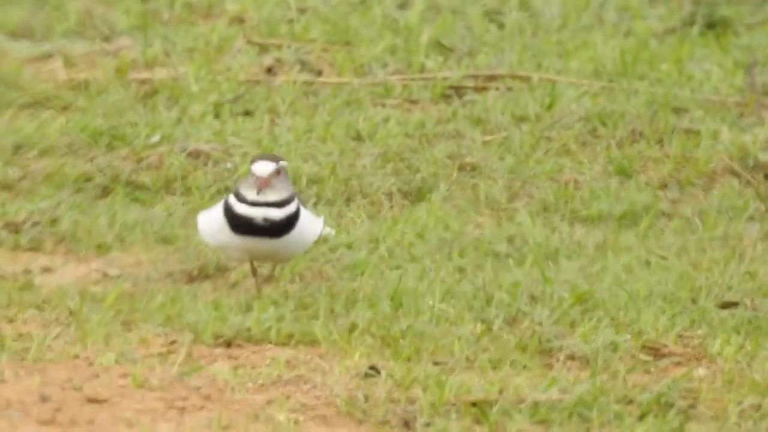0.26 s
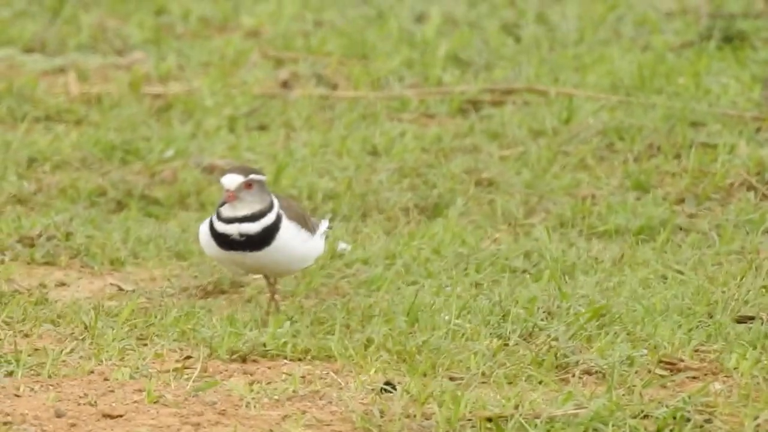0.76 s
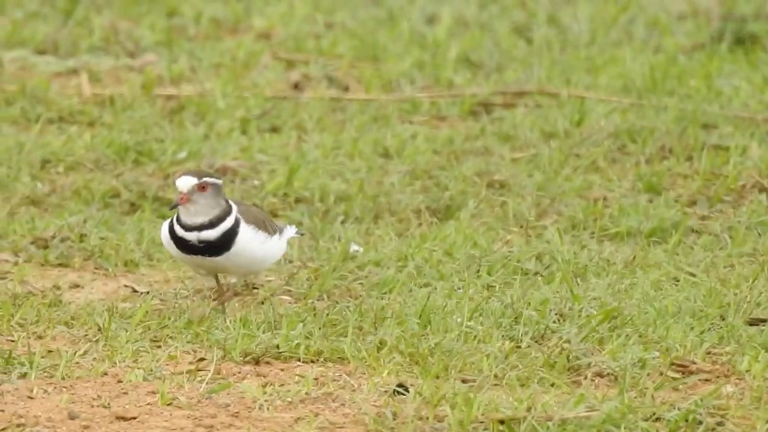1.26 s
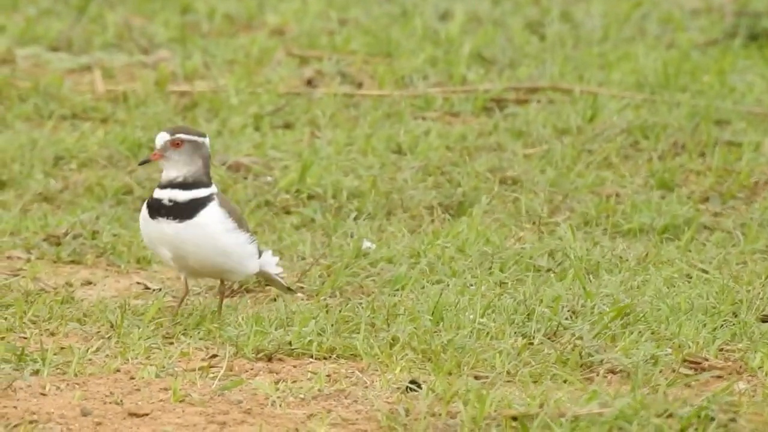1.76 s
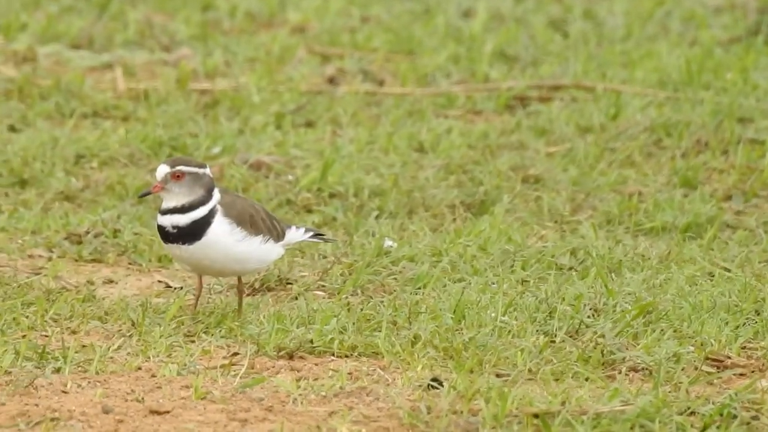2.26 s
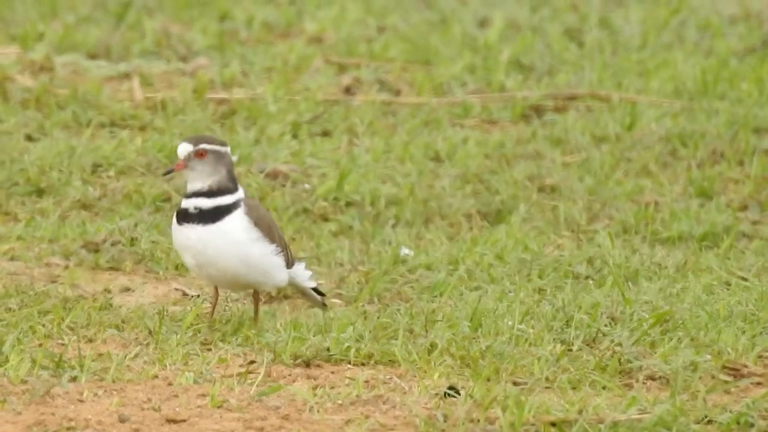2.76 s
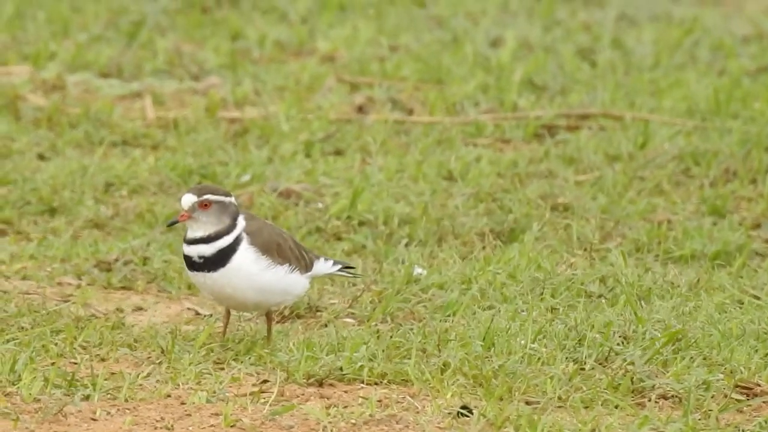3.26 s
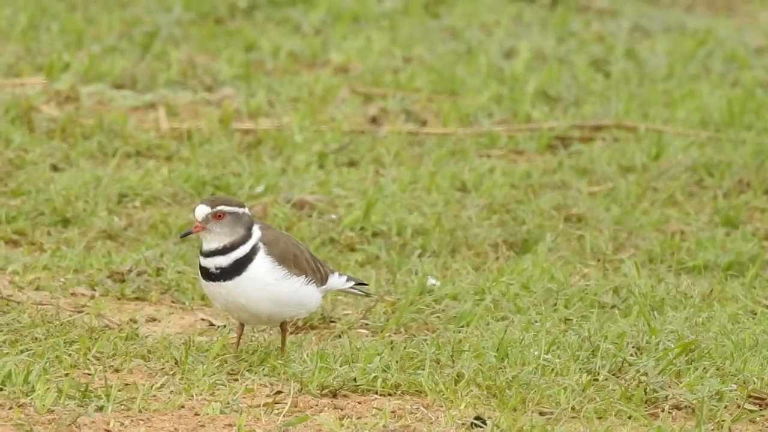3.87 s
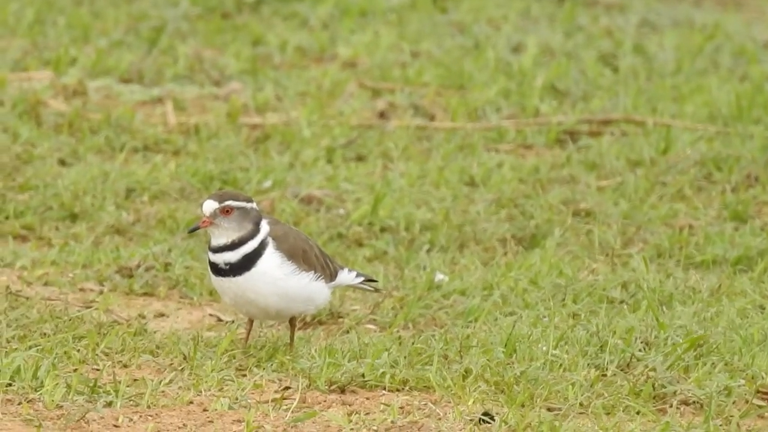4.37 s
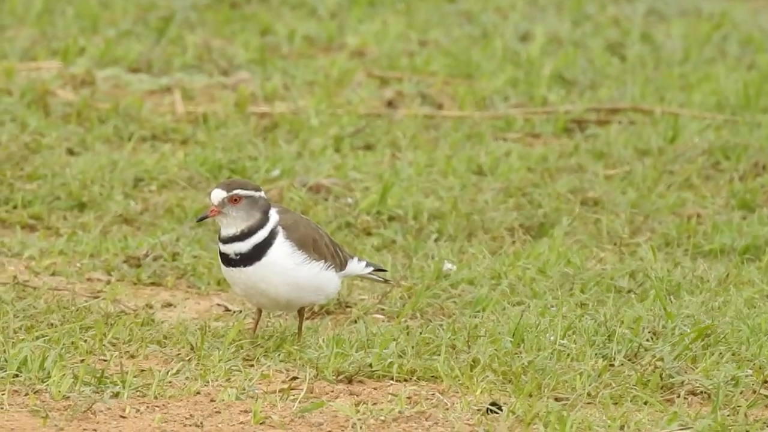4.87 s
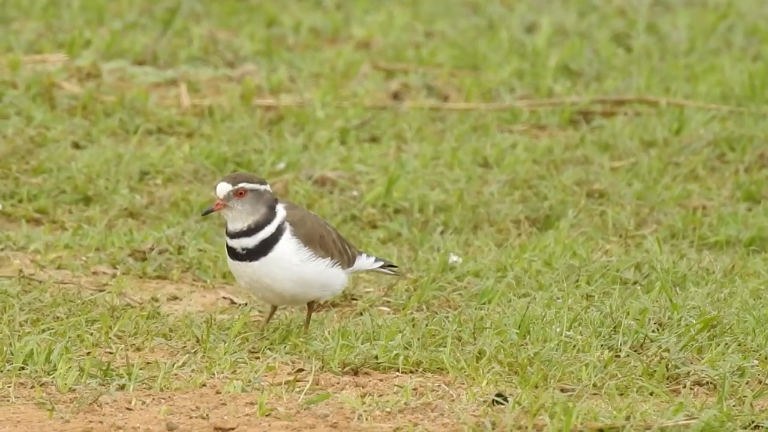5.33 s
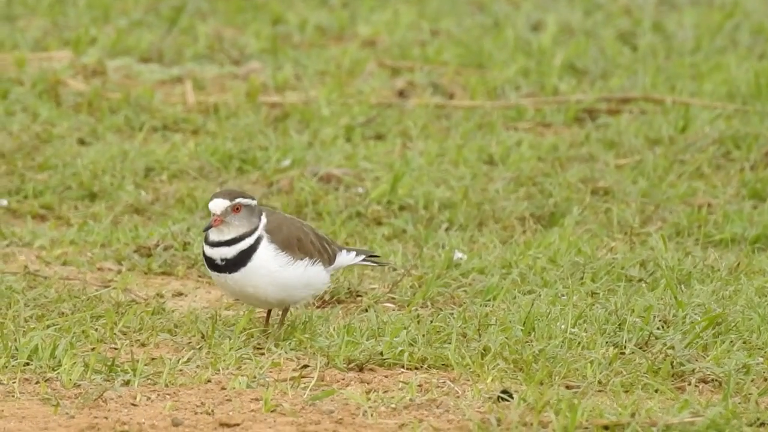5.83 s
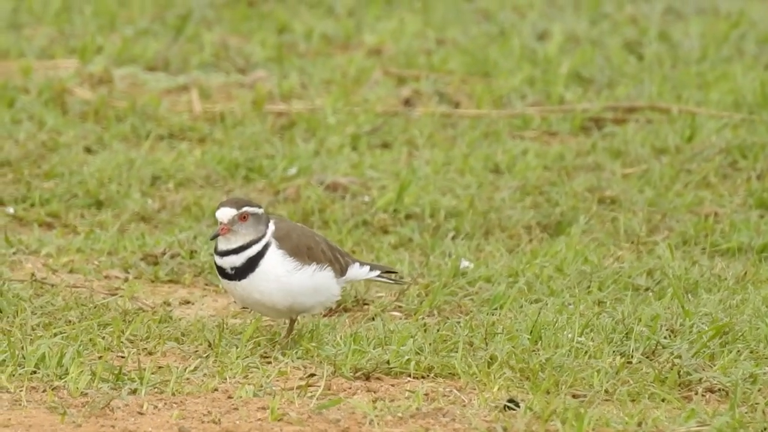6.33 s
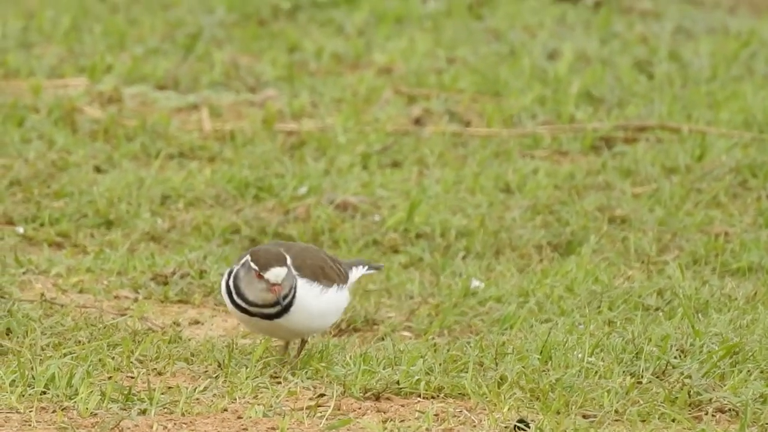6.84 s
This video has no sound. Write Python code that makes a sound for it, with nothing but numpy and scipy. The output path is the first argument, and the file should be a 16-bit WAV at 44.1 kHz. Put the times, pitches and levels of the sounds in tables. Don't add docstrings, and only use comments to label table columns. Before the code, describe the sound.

Thin bassless hiss with far-off wailing ibises and slurred songbird notes, then a close plover's piercing short whistles with stuttering lead-in pips.

```python
import sys
import numpy as np
from scipy import signal
from scipy.fft import rfft, irfft
from scipy.io import wavfile
from scipy.ndimage import uniform_filter1d

SR = 44100
rng = np.random.default_rng(int(sys.argv[2]) if len(sys.argv) > 2 else 0)


def store_pcm(level_fs):
    pcm = np.round(np.clip(level_fs, -1, 1) * 32767).astype(np.int16)
    wavfile.write(sys.argv[1], SR, np.atleast_2d(pcm).T)


def volts(x):
    e = np.asarray(x, float) / 20
    return 10 ** e


N = 313110

# frequency in Hz, level in dB per Hz.
HISS_COLOUR = [(180, -76.5), (300, -53.5), (678, -53), (1190, -25.5), (1390, -16), (1690, -17), (1840, -10),
               (2560, -1.5), (2930, -1.5), (4990, -6.5), (14700, -14.5), (16000, -16.5)]
# start in seconds, length in seconds, top pitch in Hz, 3rd harmonic in dB,
# 4th harmonic in dB.
IBIS_WAILS = [(-.08, 0.29, 501, -74.5, -65.5), (.22, 0.16, 460, -73, -79), (.41, .36, 548, -67.5, -58.5),
              (1.04, 0.48, 498.4, -70.5, -68), (1.45, 0.31, 472, -74.5, -77.5), (2.06, 0.32, 548, -70, -58),
              (2.16, 0.17, 470, -83, -73.5), (2.65, 0.14, 508, -73.5, -66), (2.85, 0.23, 470, -77, -75.5),
              (3.33, 0.44, 502, -67.5, -70.5), (3.68, 0.28, 540, -70.5, -63), (4.12, 0.4, 475, -77, -77),
              (4.45, 0.36, 513, -66, -73.5), (4.8, 0.32, 506, -79, -68.5), (5.03, 0.48, 501, -71.5, -64.5),
              (5.6, 0.2, 492, -66, -68), (5.92, 0.14, 519, -70, -65.5), (6.1, 0.32, 545, -72, -67)]
# start in seconds, length in seconds, top pitch in Hz,
# 3rd harmonic in dB, 4th harmonic in dB.
IBIS_DROPS = [(.74, 0.24, 450, -77, -64.5), (2.24, 0.13, 525, -60.5, -71), (2.37, .22, 445, -75, -63),
              (2.38, 0.21, 500.3, -69, -78), (5.35, 0.3, 465, -71.5, -78.5), (7.0, 0.26, 532, -72, -78)]
# share of the length, pitch ratio, 3rd harmonic in dB, 4th harmonic in dB.
WAIL_COURSE = [(0, 0.92, -5, -6.5), (0.131, 0.98, -2, 0.7), (.5, 1, -.1, -2.5), (.75, 1, -4, -6),
               (1, 0.98, -10, -8)]
# share of the length, pitch ratio, 3rd and 4th harmonic in dB.
DROP_COURSE = [(0, 1, -0.5, 1.5), (.5, 1, -2.5, -5), (1, 0.96, -10, -13)]
# frequency in Hz, level against the 4th harmonic in dB.
THROAT = [(700, -27), (1000, -28), (1500, -12.5), (1900, 3.5), (2200, 3), (2700, -6), (3300, -17.5),
          (4500, -29)]
# time in seconds, pitch in Hz, level in dB.
SLURS = [
    [(0.0, 3460, -35.5), (0.008, 3487, -38.5), (0.044, 3514, -41), (0.098, 3660, -52), (0.114, 3680, -57),
     (0.125, 3800, -70)],
    [(2.82, 4790, -70), (2.84, 4850, -54), (2.962, 4260, -47), (3.028, 4090, -45.5), (3.056, 3996, -42),
     (3.072, 3790, -68)],
    [(3.165, 4360, -65), (3.173, 4250, -53), (3.187, 4050, -48), (3.205, 4064, -44.5), (3.265, 4170, -51.5),
     (3.28, 4020, -52)],
    [(3.285, 3880, -55), (3.323, 3850, -46), (3.441, 3527, -45), (3.521, 3499, -49.5), (3.587, 3660, -56),
     (3.605, 3640, -63)],
    [(6.975, 4890, -69), (7.005, 4805, -49), (7.045, 4530, -43.5), (7.083, 4364, -43.5), (7.1, 4280, -44)],
]
# start in seconds, length in seconds, start pitch in Hz,
# end pitch in Hz, peak in dB.
SMALL_CHIRPS = [(1.028, 0.35, 3380, 3260, -65), (3.158, 0.048, 3000, 3050, -53),
                (3.207, .051, 3680, 3570, -55.5), (3.24, .023, 2810, 2750, -57),
                (3.359, 0.055, 3270, 3180, -50), (3.652, 0.078, 2610, 2670, -56.5),
                (4.0, 0.064, 2980, 3310, -59), (5.179, .23, 3025, 2710, -58), (5.39, .072, 2970, 3300, -50),
                (5.465, 0.039, 3645, 2860, -52), (5.681, 0.051, 2980, 2830, -57.5)]
# time in seconds, pitch in Hz, peak in dB.
MATE_WHISTLES = [
    [(1.704, 4930, -41), (1.727, 4840, -37), (1.745, 4734, -48), (1.766, 4605, -35.5), (1.778, 4720, -44.5),
     (1.789, 4830, -34.5)],
    [(1.969, 4520, -36.5), (1.977, 4760, -36.5), (1.983, 4890, -43), (1.992, 4770, -29), (2.005, 5170, -35)],
]
# top of the closing flick in Hz, 2nd harmonic in dB,
# 3rd harmonic in dB, husky side tones in dB.
MATE_TIMBRE = [(5590, -39, -65, -39), (5660, -41, -57, -43)]
# start in seconds,
# peak in dB, pitch in Hz, rattle in dB, # length in ms.
LEAD_IN_PIPS = [(1.959, -52, 4140, -38, 2.9), (1.968, -54.5, 4300, -37, 3), (4.5917, -21, 4130, -30, 2.5),
                (4.5978, -15, 4760, -27, 3.2), (4.606, -52.5, 4920, -32, 6.3),
                (4.853, -31.5, 4300, -31, 3.8), (4.862, -18.5, 4290, -25.5, 5.5),
                (4.871, -10, 4544, -32, 6.3), (4.875, -48, 4570, -39, 3.3), (5.135, -37, 4235, -37.5, 2),
                (5.143, -22, 4370, -25, 3.7), (5.151, -9, 4350, -37, 5.5), (5.159, -7, 4567, -33, 6.1),
                (5.163, -53, 4860, -22, 2.2), (5.822, -31.5, 4320, -37.5, 4), (5.829, -9.5, 4400, -42, 2.6),
                (5.835, -10, 4490, -35.5, 5.1), (6.109, -44, 4540, -35, 3.2),
                (6.116, -23, 4350, -30.5, 3.8), (6.123, -29.5, 4700, -25.5, 4.8),
                (6.13, -21.5, 4530, -35, 6), (6.134, -48.5, 4970, -29, 4.2)]
# time in seconds, pitch in Hz, peak in dB.
NEAR_WHISTLES = [
    [(4.607, 4885, -12), (4.616, 4872, -6.5), (4.625, 4835, -5.5), (4.633, 4728, -10.5), (4.645, 4530, -10),
     (4.657, 4533, -12), (4.67, 4634, -14), (4.677, 4460, -14), (4.688, 4860, -14)],
    [(4.88, 4685, -11), (4.888, 4800, -7), (4.893, 4860, -13.5), (4.899, 4936, -13.5), (4.909, 4856, -8)],
    [(5.167, 4686, -5), (5.18, 4784, -11), (5.189, 4716, -6), (5.2, 4770, -11.5), (5.208, 4910, -8)],
    [(5.843, 4537, -8.5), (5.849, 4762, -4.5), (5.858, 4775, -5), (5.867, 4695, -5.5), (5.876, 4610, -22),
     (5.885, 4485, -8.5), (5.897, 4610, -10), (5.908, 4655, -12.5)],
    [(6.139, 4597, -12), (6.147, 4608, -9), (6.157, 4636, -10.5), (6.166, 4745, -17), (6.174, 4860, -13.5)],
]
# top of the closing flick in Hz, 2nd harmonic in dB,
# 3rd harmonic in dB, husky side tones in dB.
NEAR_TIMBRE = [(5444, -33, -67, -42), (5430, -29.5, -50.5, -46), (5420, -29.5, -42.5, -45.5),
               (5380, -25, -42, -51), (5193, -28.5, -49, -50.5)]


def in_time(rows):
    s, *columns = np.transpose(rows)
    at = np.arange(max(0, round(s[0] * SR)), min(N, round(s[-1] * SR)))
    return at, [np.interp(at / SR, s, column) for column in columns]


def at_hz(points, hz):
    point_hz, point_db = np.array(points).T
    return np.interp(np.log(hz), np.log(point_hz), point_db)


def drift(rate_hz):
    r = np.exp(-64 * np.pi * rate_hz / SR)
    noise = rng.standard_normal(N // 32 + 1002)
    slow = signal.lfilter([1], [1, -2 * r, r * r], noise)[1000:]
    return np.interp(np.arange(N) / 32, np.arange(len(slow)), slow / slow.std())


def rounded(curve, ms):
    return uniform_filter1d(curve, max(1, int(ms * SR / 1000)), mode="nearest")


def soft_ends(at, ms):
    rise = np.where(at[0] > 0, at - at[0], SR)
    fall = np.where(at[-1] < N - 1, at[-1] - at, SR)
    return np.clip(np.minimum(rise, fall) / (ms * SR / 1000), 0, 1)


def filtered(x, order, hz, kind):
    return signal.sosfilt(signal.butter(order, hz, kind, fs=SR, output="sos"), x)


def hiss():
    level_db = -56.5
    hz = np.maximum(np.arange(N // 2 + 1) * SR / N, 1)
    colour = volts(at_hz(HISS_COLOUR, hz))
    low = 1 / (1 + (hz / 3500) ** 4)
    stirring = irfft(rfft(rng.standard_normal(N)) * colour * np.sqrt(low), N) * volts(1.1 * drift(4.1))
    steady = irfft(rfft(rng.standard_normal(N)) * colour * np.sqrt(1 - low), N)
    both = stirring + steady
    return volts(level_db) * both / np.std(both)


def cries(rows, course, sag_per_s, curve):
    calls = []
    for s, length, top_hz, third_db, fourth_db in rows:
        call = []
        for u, ratio, a_db, b_db in course:
            sag = 1 - sag_per_s * length * u ** curve
            call.append((s + u * length, top_hz * ratio * sag, third_db + a_db, fourth_db + b_db))
        calls.append(call)
    return calls


def flock():
    count = 70
    arch = [(0, 0.97, -6), (.3, 0.99, 0.5), (.65, 0.9, -2), (1, 0.81, -7.5)]   # share, pitch ratio, dB
    calls = []
    for a, b, c, d, tilt in rng.random((count, 5)):
        s, length = 6.7 * a, 0.081 + 0.18 * b
        hz, level_db = 420 + 160 * c, -83 + 8 * d
        calls.append([(s + u * length, hz * ratio,
                       level_db + db - 6 * tilt, level_db + db + 6 * tilt - 5.5) for u, ratio, db in arch])
    return calls


def ibises():
    out = np.zeros(N)
    shimmer, waver = volts(2.3 * drift(15)), 1 + 0.0042 * drift(21)
    calls = cries(IBIS_WAILS, WAIL_COURSE, sag_per_s=.36, curve=2.2)
    calls += cries(IBIS_DROPS, DROP_COURSE, sag_per_s=.6, curve=0.94)
    calls += flock()
    for rows in calls:
        at, (hz, third_db, fourth_db) = in_time(rows)
        hz = rounded(hz, 45)
        phase = 2 * np.pi * np.cumsum(hz * waver[at]) / SR
        tone = volts(third_db) * np.sin(3 * phase) + volts(fourth_db) * np.sin(4 * phase)
        for k in (2, 5, 6, 7):
            tone += volts(fourth_db + at_hz(THROAT, k * hz)) * np.sin(k * phase + k)
        out[at] += soft_ends(at, 25) * tone * shimmer[at]
    return filtered(volts(0.5) * out, 4, 1250, "high")


def whistles(notes, overtones_db, edge_ms):
    out, husk = np.zeros(N), drift(220)
    for rows, (second_db, third_db, side_db) in zip(notes, overtones_db):
        rows = np.array(rows, float)
        rows[:, 2] = volts(rows[:, 2])
        at, (hz, height) = in_time(rows)
        phase = 2 * np.pi * np.cumsum(rounded(rounded(hz, 3), 3)) / SR
        height = rounded(rounded(height, 1.5), 1.5)
        opening = (hz / 4700) ** 6.1
        overtones = opening * volts(second_db) * np.cos(2 * phase + 0.69)
        overtones += volts(third_db) / opening * np.sin(3 * phase)
        side_tones = np.sin(.68 * phase) + 0.43 * np.sin(1.47 * phase)
        overtones += volts(side_db) * husk[at] * side_tones
        tone = height * np.sin(phase + 1) + rounded(height, 19) * overtones
        out[at] += soft_ends(at, edge_ms) * tone
    return out


def songbird():
    return volts(3.5) * whistles(SLURS, [(-40.5, -65, -61)] * len(SLURS), edge_ms=2.0)


def chirps():
    arch_hz = 95
    out = np.zeros(N)
    for s, length, start_hz, end_hz, peak_db in SMALL_CHIRPS:
        u = np.arange(int(length * SR)) / (length * SR)
        hz = start_hz + (end_hz - start_hz) * u + arch_hz * np.sin(np.pi * u)
        tone = np.sin(2 * np.pi * np.cumsum(hz) / SR)
        out[round(s * SR):][:len(u)] += volts(peak_db) * np.sin(np.pi * u) ** 0.55 * tone
    return out


def plover_whistles(bodies, voices, edge_ms):
    attack_s, attack_db = 0.0033, -11
    flick_s, flick_db = .007, -1.5
    release_s, release_db = .005, -12
    notes = []
    for rows, (top_hz, *_) in zip(bodies, voices):
        first_s, first_hz, first_db = rows[0]
        last_s, _, last_db = rows[-1]
        top_s, top_db = last_s + flick_s, last_db + flick_db
        notes.append([(first_s - attack_s, first_hz, first_db + attack_db), *rows,
                      (top_s, top_hz, top_db), (top_s + release_s, top_hz, top_db + release_db)])
    return whistles(notes, [voice[1:] for voice in voices], edge_ms)


def mate():
    flutter_db, flutter_hz = 1.5, 90
    calls = plover_whistles(MATE_WHISTLES, MATE_TIMBRE, edge_ms=1.8)
    return calls * volts(flutter_db * drift(flutter_hz))


def pips():
    upper_rattle_db = -6.5
    out = np.zeros(N)
    puff = filtered(rng.standard_normal(N), 3, [2800, 4200], "band")
    for s, peak_db, hz, rattle_db, ms in LEAD_IN_PIPS:
        u = np.arange(int(ms * SR / 1000)) / (ms * SR / 1000)
        at = round(s * SR)
        bend = 1 + 0.15 * np.exp(-u / 0.058) + .06 * u ** 3
        phase = 2 * np.pi * np.cumsum(hz * bend) / SR
        tone = volts(peak_db) * (np.sin(phase) + volts(-32.0) * np.sin(2 * phase))
        rattle = 0.5 * np.sin(0.73 * phase) + 1.53 * puff[at:at + len(u)]
        rattle += volts(upper_rattle_db) * np.sin(1.2 * phase)
        swell = np.sin(np.pi * u ** .6) ** 1.5
        out[at:at + len(u)] += swell * (tone + volts(rattle_db) * rattle)
    return out


def near_plover():
    calls = volts(0.1) * plover_whistles(NEAR_WHISTLES, NEAR_TIMBRE, edge_ms=1.0) + pips()
    return filtered(calls, 6, 2300, "high")


def scatter(x, t60, first_ms, first_db):
    treble_hz, treble_t60_share = 5000, .65
    t = np.arange(int(.7 * SR)) / SR
    noise = rng.standard_normal(len(t))
    dull = signal.sosfiltfilt(signal.butter(4, treble_hz, fs=SR, output="sos"), noise)
    haze = dull * volts(-60 * t / t60)
    haze += (noise - dull) * volts(-60 * t / (treble_t60_share * t60))
    haze += noise * volts(first_db) * np.exp(-1000 * t / first_ms)
    haze *= (t > .003) * volts(2.5 * drift(60)[:len(t)])
    return signal.fftconvolve(x, haze / np.sqrt(np.sum(haze ** 2)))[:N]


def scene():
    far = ibises() + songbird() + chirps()
    answer = mate()
    near = near_plover()
    out = hiss() + far + volts(-16) * scatter(far, t60=0.31, first_ms=20, first_db=4.5)
    out += volts(-0.5) * answer + volts(-3.0) * scatter(answer, t60=0.61, first_ms=20, first_db=1)
    out += near + volts(-13) * scatter(near, t60=0.49, first_ms=11, first_db=16.5)
    return out[None]


def roll_off(x):
    return signal.sosfilt(signal.butter(12, 16130, fs=SR, output="sos"), x)


def record(dry):
    overload = .505
    mix = np.clip(dry[0], -overload, overload)
    return roll_off(mix)


dry = scene()
out = record(dry)
store_pcm(out)
```